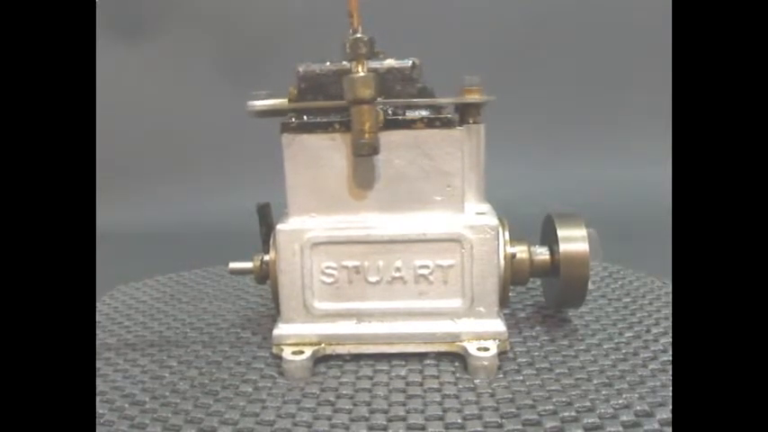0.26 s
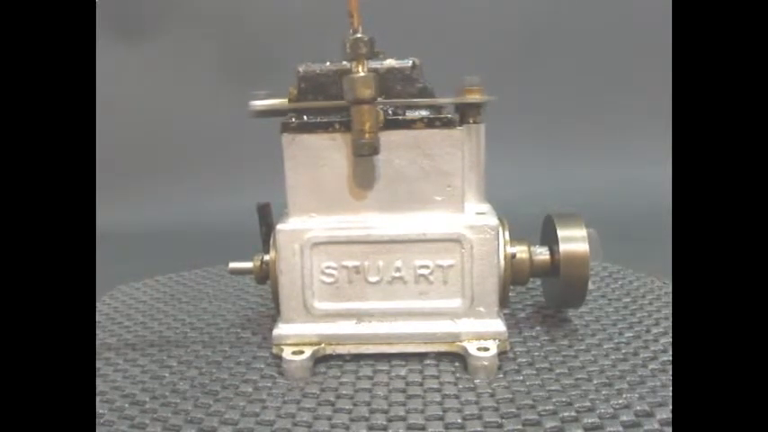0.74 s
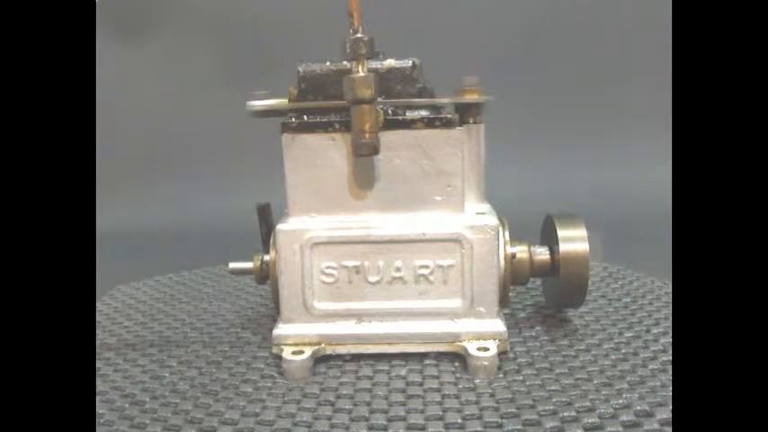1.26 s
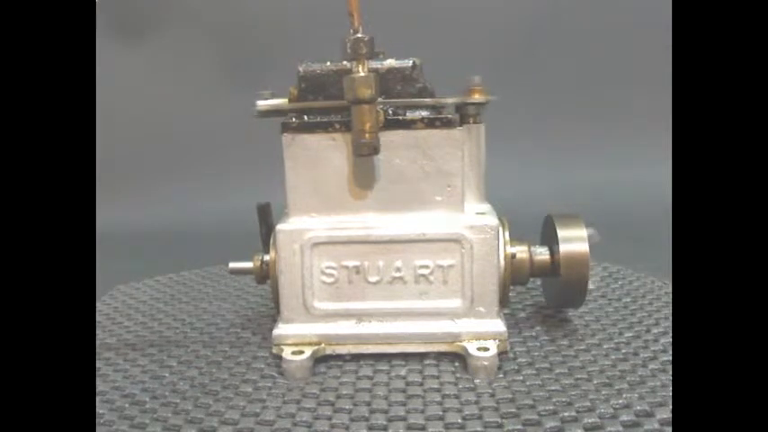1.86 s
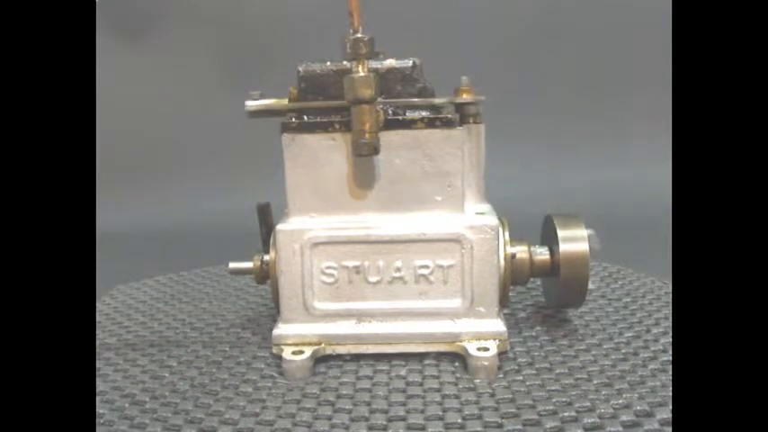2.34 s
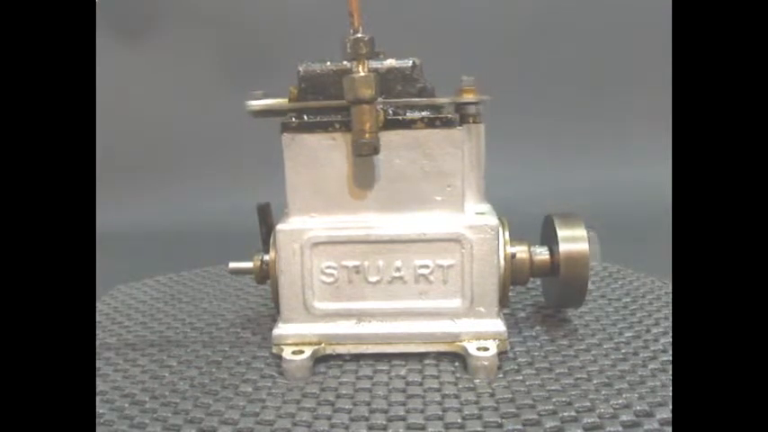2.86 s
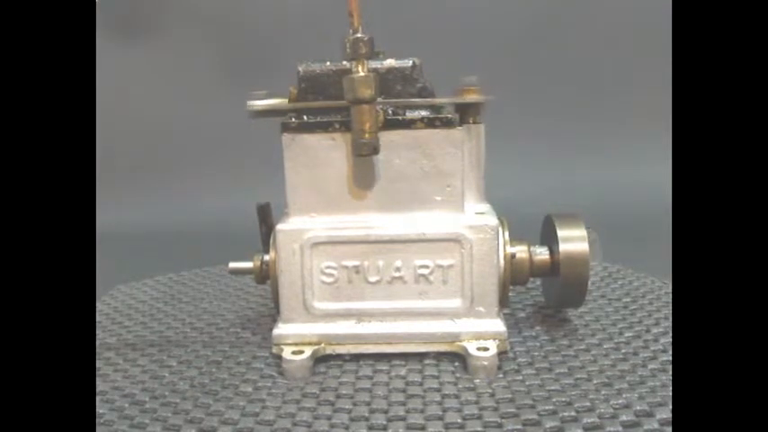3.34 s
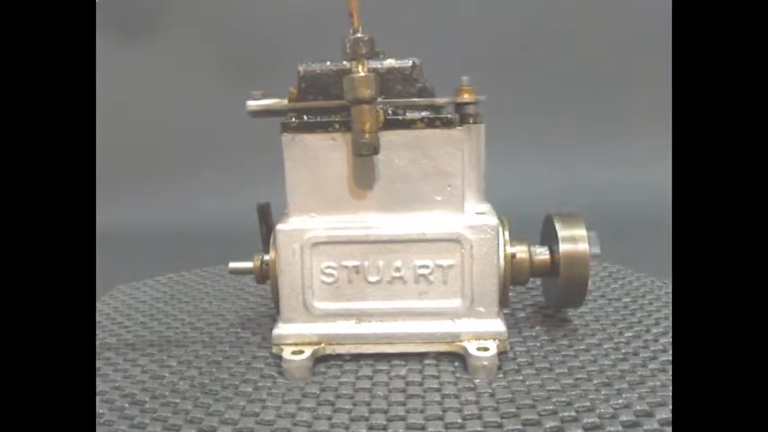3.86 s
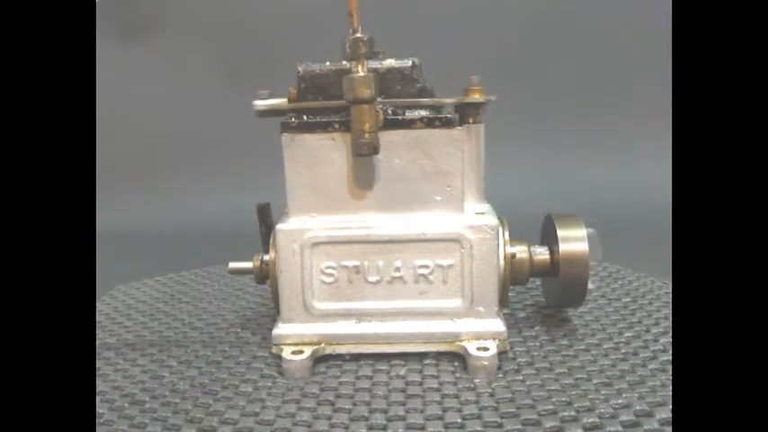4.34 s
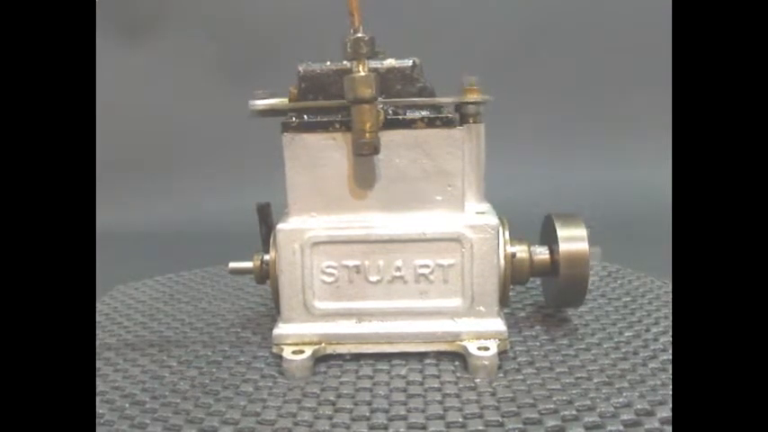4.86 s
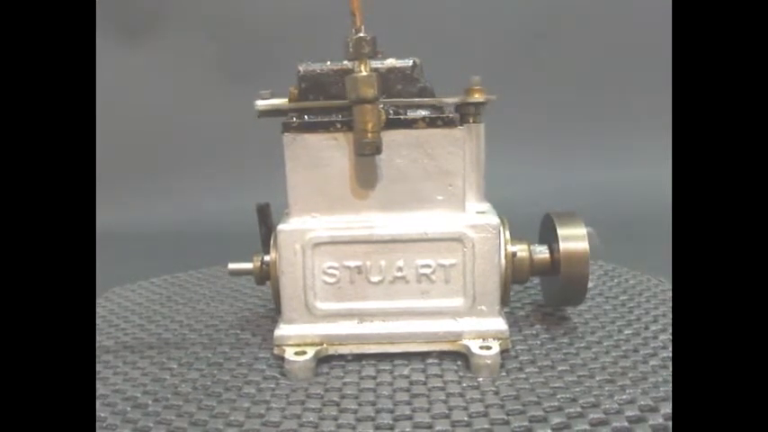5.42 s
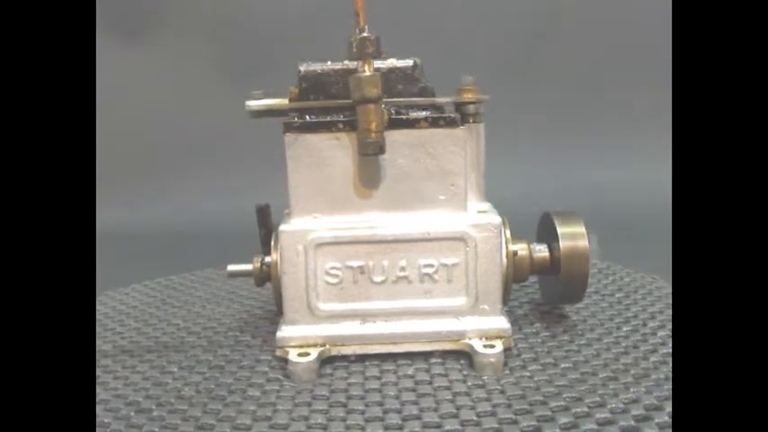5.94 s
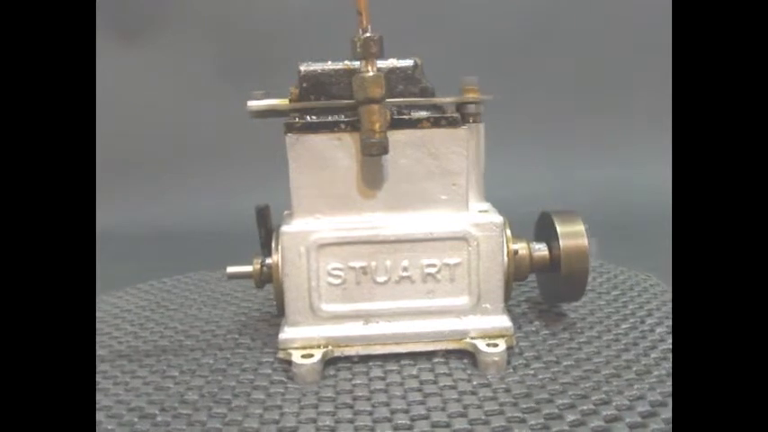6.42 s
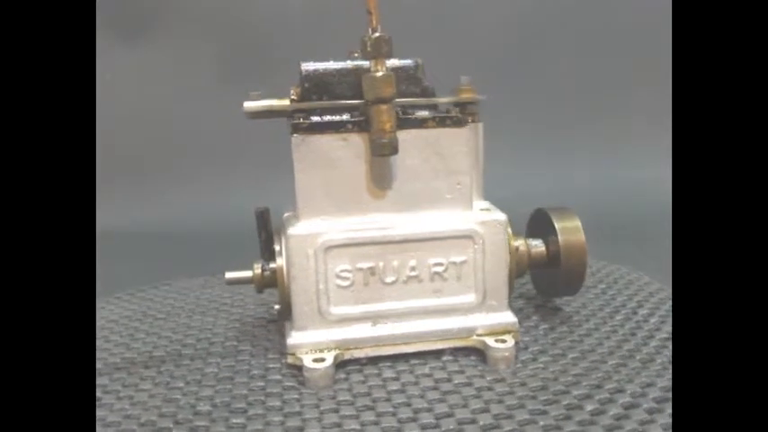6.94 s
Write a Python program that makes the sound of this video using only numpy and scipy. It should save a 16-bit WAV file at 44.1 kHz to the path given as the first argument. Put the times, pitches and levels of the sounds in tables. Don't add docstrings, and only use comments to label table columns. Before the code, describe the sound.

A small twin-cylinder model engine runs fast on compressed air, bright paired valve claps chattering over soft exhaust pops, ticking gears and hiss.

```python
import sys
import numpy as np
from scipy import signal
from scipy.fft import rfft, irfft
from scipy.io import wavfile
from scipy.ndimage import uniform_filter1d

SR = 44100
rng = np.random.default_rng(int(sys.argv[2]) if len(sys.argv) > 2 else 0)


def magnitude_from_level(level_db):
    exponent = np.asarray(level_db, float) / 20
    return 10 ** exponent


def to_wav(sig):
    pcm = np.clip(np.atleast_2d(sig), -1, 1) * 32767
    pcm = np.round(pcm).astype(np.int16)
    wavfile.write(sys.argv[1], SR, pcm.T)


N = 316638

# start_s, speed_turns_per_s
FLYWHEEL_SPEED = [(0, 14.875), (0.22, 13.336), (1.46, 10.531), (1.52, 10.907), (1.66, 10.323), (2.14, 9.06),
                  (2.31, 9.173), (2.51, 11.19), (2.88, 11.557), (3.11, 11.605), (3.42, 10.759),
                  (3.81, 7.617), (3.96, 7.321), (4.17, 10.491), (4.24, 9.962), (4.9, 10.329),
                  (5.84, 10.272), (7.18, 10.299)]
FIRST_CLAP_TURN = 0.2474
USUAL_SPEED = 10.3
CHOKE_SPEED = 13.1

STALL_TURN, STALL_WIDTH_TURNS = 0.626, 0.07
STALL_DB_PER_MS, EASY_TURN_MS = -0.1538, 86

# (dB at usual speed, dB gained per dB of speed)
CLAP_ONE_LAW, CLAP_TWO_LAW = (-22.5, 2.35), (-27, 1.4)
PORT_ONE_LAW, PORT_TWO_LAW = (-37, 0.72), (-31.5, 3.03)
KNOCK_LAW, TICK_LAW, LEAK_LAW = (-40, 0.96), (-36.5, 1.66), (-33.5, 1.26)

# pitch_hz, level_db (per Hz)
LEAK_SPECTRUM = [(60, -56), (160, -15), (500, -9.5), (1500, -6), (2200, -8.5), (3500, -15), (5400, -16.5),
                 (8800, -3), (12000, -16), (15600, -41)]
# pitch_hz, level_db
WALL_ECHOES = [(60, -16), (170, -19), (500, -17), (1460, -14), (4240, -11), (8000, -5), (12300, 0)]

# angle_turns, level_db, favoured_hz, loss_db_per_octave
KNOCKS = [(0.023, -32.5, 830, 4), (0.027, -29.5, 1930, 41), (.068, -29, 1275, 23), (0.11, -26, 1295, 24),
          (.137, -32, 1260, 30), (.186, -36.5, 1160, 2), (0.235, -35, 1380, 23), (.272, -33.5, 1750, 29),
          (.306, -33, 1900, 24), (.351, -28.5, 1810, 42), (.386, -29.5, 1570, 14), (0.432, -32, 1530, 32),
          (.481, -26, 1320, 41), (.504, -29.5, 1910, 18), (.541, -25, 1250, 50), (.594, -32.5, 840, 14),
          (.628, -24, 977, 40), (0.655, -34.5, 900, 11), (.658, -29, 1495, 42), (0.689, -31, 831, 35),
          (.718, -25.5, 1655, 50), (0.765, -32, 1540, 43), (.818, -25.5, 1495, 49), (0.855, -29, 1550, 51),
          (.889, -31, 1089, 55), (0.894, -30, 1480, 19), (.929, -34.5, 1400, 18), (.969, -24, 974, 26),
          (.973, -30, 1920, 24), (.994, -29.5, 1075, 39)]
# pitch_hz, level_db, t60_s
CRANKCASE = [
    [(831, 2.5, 0.017)],
    [(1083.4, 1, 0.027)],
    [(1273, 0, 0.014)],
    [(1473, -0.5, 0.034)],
    [(1830, 2.5, 0.0095), (2125, -0.5, 0.0094)],
]
# angle_turns, low_tick_db, high_tick_db
TICKS = [(0.03, -42.5, -36), (0.072, -48, -28), (0.115, -33, -38), (0.141, -46, -33), (0.19, -56, -30),
         (0.238, -50, -26.5), (0.276, -39, -28), (0.31, -28.5, -26), (0.355, -30.5, -26), (0.39, -31, -28),
         (0.435, -28.5, -30.5), (0.485, -30, -37), (0.56, -32, -42), (0.598, -30, -39), (0.64, -48, -42),
         (0.68, -50, -40), (0.722, -56, -37), (0.768, -45, -34.5), (0.815, -42, -41), (0.86, -35, -55),
         (0.895, -63, -28), (0.933, -39, -34), (0.975, -30.5, -23.5)]
# pitch_hz, width_hz, level_db
TICK_LOW_COLOUR = [(6080, 970, 0)]
# pitch_hz, width_hz, level_db
TICK_HIGH_COLOUR = [(7870, 170, -1), (9370, 1000, -4.5), (10050, 1700, -16)]
# pitch_hz, level_db, t60_s
TOOTH_LOW_RING = [(5530, 1, 0.0081), (6550, -17, 0.0031)]
# pitch_hz, level_db, t60_s
TOOTH_HIGH_RING = [(7400, 2.5, 0.0074), (8750, -9, 0.002), (9280, 1.5, 0.0053), (10500, 2, 0.0029)]

# angle_turns, lag_ms, cylinder (0 or 1), push_db, pipe_ring_db, pipe_hz, t60_s
POPS = [
    (0.016, 2.7, 0, -3, 6.5, 448, 0.015),
    (0.081, 2.68, 0, 1.5, 5, 450, 0.012),
    (0.123, 2.48, 0, -19, 6, 553, 0.014),
    (0.47, 1.8, 0, 8, -8, 385, 0.031),
    (0.522, 2.88, 1, -8, 5.5, 473, 0.035),
    (0.561, 6.19, 1, -19, -3, 533, 0.049),
    (.585, 9.81, 1, -41, 2, 575, 0.024),
]
# pitch_hz, level_db, t60_s
MAT_THUD = [(193, -7.5, 0.028), (337, -9.5, 0.019)]

# pitch_hz, width_hz, level_db
CLAP_ONE_COLOUR = [(8620, 460, 4.5), (7500, 800, -1.5), (5280, 470, -11), (3360, 230, -19.5),
                   (11800, 1100, -14)]
# pitch_hz, width_hz, level_db
CLAP_TWO_COLOUR = [(7040, 590, -1), (9390, 380, 0.5), (4670, 1180, -7), (5280, 1050, -6),
                   (11540, 690, -9.5), (3070, 89, -42)]
# start_s, extra_db
ODD_CLAPS = [(0.195, 3.4), (0.231, 3), (0.783, 4), (0.826, 3), (0.951, 3.3), (1.262, 3.2), (1.493, 2.2),
             (1.635, 3.5), (1.78, 3), (1.881, 3.5), (1.935, 2), (1.985, -2), (2.508, 2.5), (2.685, 3),
             (2.731, 3), (2.819, -8), (3.033, -10), (3.078, 2.8), (3.207, 0.5), (3.887, -4), (4.019, 5),
             (4.375, 2.8), (4.672, -3.1), (4.723, 5), (4.867, -3.5), (5.06, 2), (5.157, 3), (5.208, 4),
             (5.693, 2.5), (6.958, 4)]
SECOND_CLAP_TURN, CLAP_PLAY_DB = 0.521, 1.1

# pitch_hz, level_db
LEFT_MINUS_RIGHT = [(60, 4.6), (500, 4.2), (1400, 3), (2800, .8), (5500, 2), (9000, 3.5), (12000, 1.3)]
# pitch_hz, width_hz, level_db
HOUSING_NOTCHES = [(2997, 300, -7.5), (4012, 380, -7), (5010, 250, -13)]


def over_time(seconds, values):
    return np.interp(np.arange(N) / SR, seconds, values)


def sos_filter(x, order, hz, kind="low"):
    return signal.sosfilt(signal.butter(order, hz, kind, fs=SR, output="sos"), x)


def colour(x, points, power=1):
    hz, db = np.transpose(points)
    log_hz = np.log(np.maximum(np.fft.rfftfreq(N, 1 / SR), 1))
    return irfft(rfft(x) * magnitude_from_level(power * np.interp(log_hz, np.log(hz), db)), N)


def clicks(seconds, sizes):
    at = np.round(np.ravel(seconds) * SR).astype(int)
    out = np.full(N, 1e-18)
    inside = (at >= 0) & (at < N)
    np.add.at(out, at[inside], np.ravel(sizes)[inside])
    return out


def ring(x, modes):
    out = 0
    for hz, db, t60 in modes:
        r = magnitude_from_level(-60 / (t60 * SR))
        w = 2 * np.pi * hz / SR
        out = out + signal.lfilter([0, magnitude_from_level(db) * np.sin(w)], [1, -2 * r * np.cos(w), r * r], x)
    return out


def burst(x, ms, peaks):
    swell = np.hanning(max(int(ms * SR / 1000), 3))
    noise = signal.oaconvolve(x, swell, "same") * rng.standard_normal(N)
    out = 0
    for k, (hz, width_hz, db) in enumerate(peaks):
        r = np.exp(-np.pi * width_hz / SR)
        w = 2 * np.pi * hz / SR
        b = magnitude_from_level(db) * (1 - r * r) / 2 * np.array([1, 0, -1]) * (-1) ** k
        out = out + signal.lfilter(b, [1, -2 * r * np.cos(w), r * r], noise)
    return out


def speed():
    seconds, turns_per_s = np.transpose(FLYWHEEL_SPEED)
    return over_time(seconds, turns_per_s)


def time_of(angle):
    rate = speed()
    turns = np.cumsum(rate) / SR - FIRST_CLAP_TURN
    turns = np.r_[turns[0] - rate[0], turns, turns[-1] + rate[-1]]
    seconds = np.r_[-1, np.arange(N) / SR, N / SR + 1]
    return np.interp(np.arange(-1, int(turns[-2]) + 1) + angle, turns, seconds)


def by_speed(law, seconds=None, top_speed=np.inf):
    usual_db, gain = law
    db = usual_db + gain * 20 * np.log10(np.minimum(speed(), top_speed) / USUAL_SPEED)
    return db if seconds is None else np.interp(seconds, np.arange(N) / SR, db)


def stall_db():
    start_s = time_of(0)
    angle = over_time(start_s, np.arange(len(start_s))) % 1
    turn_ms = over_time(start_s[:-1], 1000 * np.diff(start_s))
    slow_ms = np.maximum(turn_ms - EASY_TURN_MS, 0)
    return STALL_DB_PER_MS * slow_ms * np.exp(-((angle - STALL_TURN) / STALL_WIDTH_TURNS) ** 2)


def contacts(rows, play_ms, play_db):
    at = np.array([time_of(row[0]) for row in rows]).T
    chance = rng.standard_normal(at.shape + (len(rows[0]),))
    at = at + play_ms / 1000 * chance[..., 0]
    force = magnitude_from_level(np.array(rows)[:, 1:] + play_db * chance[..., 1:])
    return [clicks(at, force[..., k]) for k in range(force.shape[-1])]


def room(x):
    t = np.arange(SR // 4) / SR
    early, left, right = rng.standard_normal((3, len(t)))
    early = early * magnitude_from_level(-60 * t / 0.06)
    side = colour(signal.oaconvolve(x, early / np.linalg.norm(early))[:N], WALL_ECHOES)
    tails = np.array([left, right]) * magnitude_from_level(-60 * t / 0.1) * (t > 0.004)
    tail = signal.oaconvolve(x[None], tails / np.linalg.norm(tails[0]), axes=1)[:, :N]
    tail = sos_filter(tail, 2, 600, "high")
    return x + magnitude_from_level(-9.0) * side * [[1], [-1]] + magnitude_from_level(-10.5) * tail


def rumble(leak_db):
    return magnitude_from_level(-12.5 + 0.99 * (leak_db + 36)) * sos_filter(rng.standard_normal((2, N)), 2, 22)


def leak(leak_db):
    mid, side, slow = rng.standard_normal((3, N))
    flutter = sos_filter(slow, 2, 40)
    gain = magnitude_from_level(leak_db - 3.0 + 1.95 * flutter / flutter.std())
    spread = magnitude_from_level(2) * colour(side, WALL_ECHOES)
    hiss = np.array([colour(mid + spread, LEAK_SPECTRUM), colour(mid - spread, LEAK_SPECTRUM)])
    return gain * hiss / hiss.std()


def gear_ticks(tick_db):
    low, high = contacts(TICKS, play_ms=0.26, play_db=2.5)
    noise = magnitude_from_level(11.5) * burst(low, 1.58, TICK_LOW_COLOUR) + magnitude_from_level(10) * burst(high, 2.2, TICK_HIGH_COLOUR)
    teeth = magnitude_from_level(-8.0) * ring(low, TOOTH_LOW_RING) + magnitude_from_level(-8.5) * ring(high, TOOTH_HIGH_RING)
    return magnitude_from_level(tick_db + 37) * sos_filter(magnitude_from_level(-3.0) * noise + teeth, 4, 5000, "high")


def knock_rows():
    group_hz = np.array([modes[0][0] for modes in CRANKCASE])
    rows = []
    for angle, db, favoured_hz, loss_db in KNOCKS:
        octaves_away = np.abs(np.log2(group_hz / favoured_hz))
        rows.append((angle, *(db - loss_db * octaves_away)))
    return rows


def crankcase_knocks(knock_db):
    blows = contacts(knock_rows(), play_ms=0.06, play_db=1.8)
    knock = sum((-1) ** k * ring(blows[k], modes) for k, modes in enumerate(CRANKCASE))
    return magnitude_from_level(knock_db + 37.5) * sos_filter(knock, 2, [650, 2600], "band")


def exhaust():
    push, pipe = 0, 0
    for angle, lag_ms, cylinder, push_db, ring_db, hz, t60 in POPS:
        at = time_of(angle) + lag_ms / 1000
        db = by_speed([PORT_ONE_LAW, PORT_TWO_LAW][round(cylinder)], at, CHOKE_SPEED)
        chance = rng.standard_normal((len(at), 3))
        at = at + 0.00019 * chance[:, 0]
        push = push + clicks(at, magnitude_from_level(-37.5 + 1.08 * (db + 33.5) + push_db + 0.86 * chance[:, 1]))
        pipe = pipe + ring(clicks(at, magnitude_from_level(db + 0.8 * chance[:, 2])), [(hz, ring_db, t60)])
    return sos_filter(ring(push, MAT_THUD) + pipe, 2, 900)


def clap(seconds, db, ms, peaks):
    rattle = burst(clicks(seconds, np.ones(len(seconds))), ms, peaks)
    power = uniform_filter1d(rattle ** 2, 90)
    height = np.sqrt(power[(seconds * SR).astype(int)])
    return rattle * over_time(seconds, magnitude_from_level(db) / height)


def valves():
    odd_s, odd_db = np.transpose(ODD_CLAPS)
    out = 0
    for angle, law, ms, peaks in [(0, CLAP_ONE_LAW, 4.84, CLAP_ONE_COLOUR),
                                  (SECOND_CLAP_TURN, CLAP_TWO_LAW, 4.7, CLAP_TWO_COLOUR)]:
        at = time_of(angle)[1:]
        odd = np.abs(at[:, None] - odd_s) < 0.01
        play_db = CLAP_PLAY_DB * rng.standard_normal(len(at)) * ~odd.any(axis=1)
        out = out + clap(at, by_speed(law, at) + odd @ odd_db + play_db, ms, peaks)
    return out


def scene():
    falter_db = stall_db()
    leak_db = by_speed(LEAK_LAW) + falter_db
    knocks = crankcase_knocks(by_speed(KNOCK_LAW) + falter_db)
    ticks = gear_ticks(by_speed(TICK_LAW) + falter_db)
    engine = valves() + exhaust() + knocks + ticks
    return room(engine) + leak(leak_db) + rumble(leak_db)


def roll_off(x):
    return signal.sosfilt(signal.butter(12, 12880, fs=SR, output="sos"), x)


def record(dry):
    left = colour(dry[0], LEFT_MINUS_RIGHT, 1 / 2)
    right = colour(dry[1], LEFT_MINUS_RIGHT, -1 / 2)
    x = np.array([left, right])
    for hz, width_hz, db in 2 * list(HOUSING_NOTCHES):
        b, a = signal.iirnotch(hz, hz / width_hz, fs=SR)
        x = magnitude_from_level(db) * x + (1 - magnitude_from_level(db)) * signal.lfilter(b, a, x)
    x = sos_filter(x, 4, 125, "high")
    x = signal.sosfilt(signal.cheby2(10, 24, 11950, fs=SR, output="sos"), x)
    x = sos_filter(x, 8, 12500)
    return roll_off(x)


dry = scene()
out = record(dry)
to_wav(out)
```